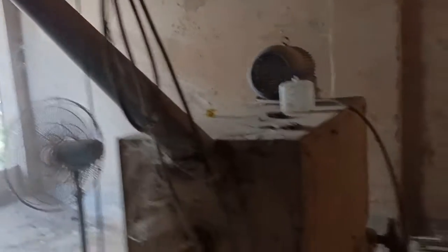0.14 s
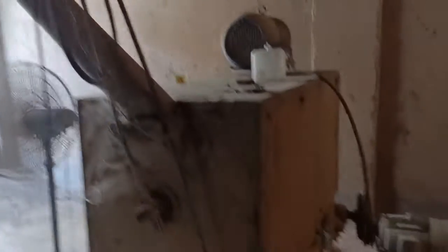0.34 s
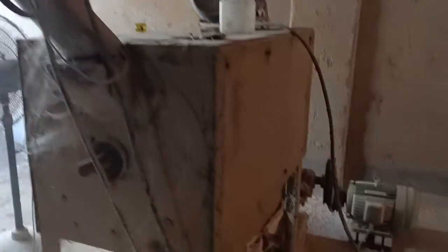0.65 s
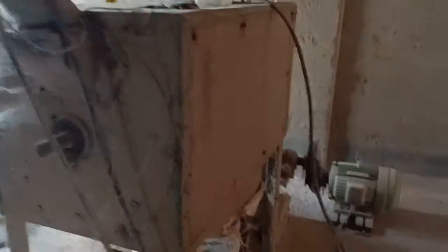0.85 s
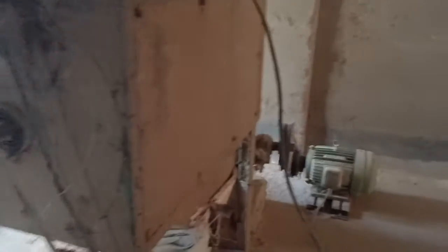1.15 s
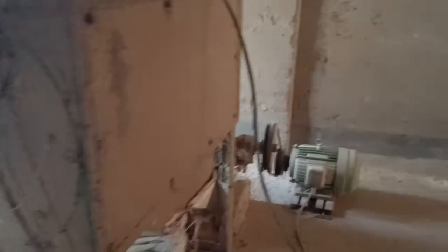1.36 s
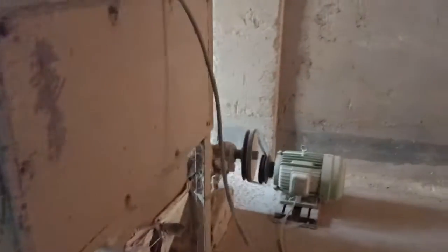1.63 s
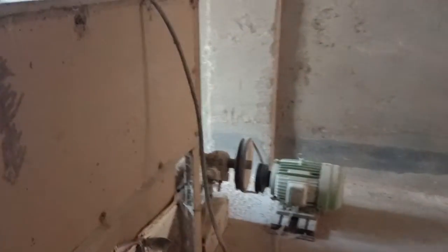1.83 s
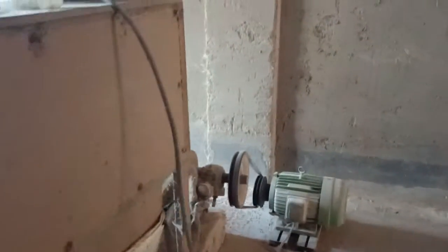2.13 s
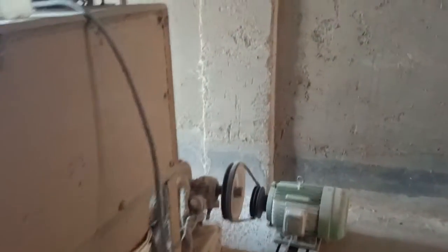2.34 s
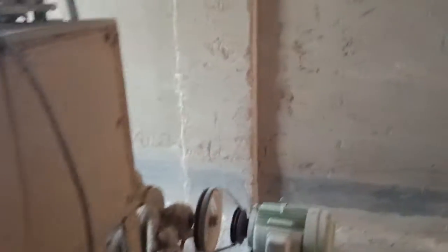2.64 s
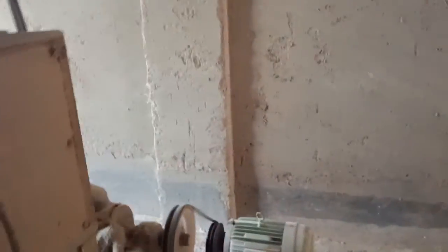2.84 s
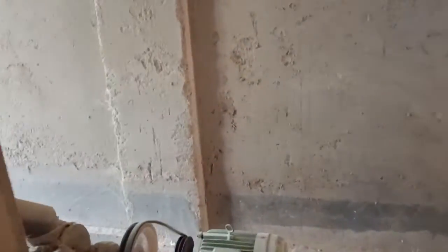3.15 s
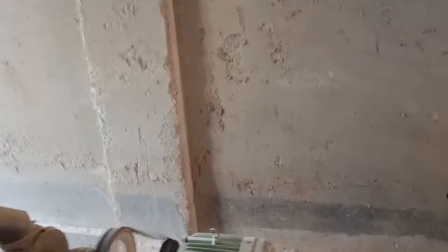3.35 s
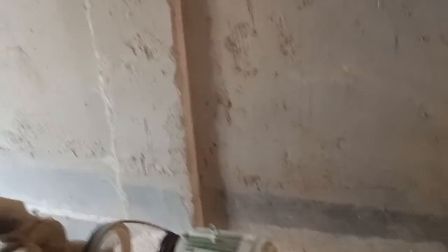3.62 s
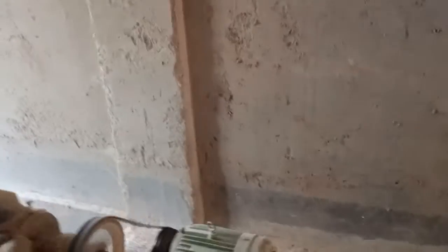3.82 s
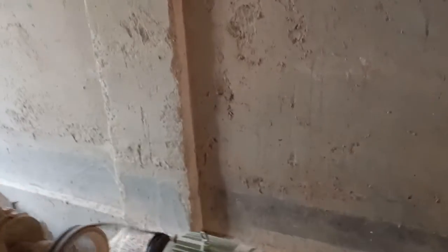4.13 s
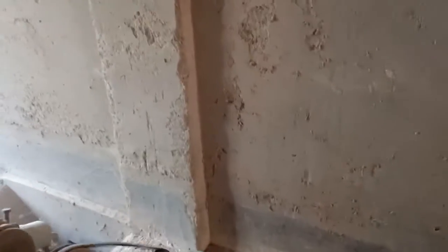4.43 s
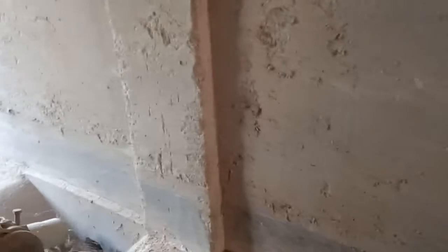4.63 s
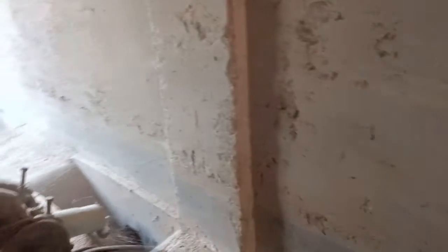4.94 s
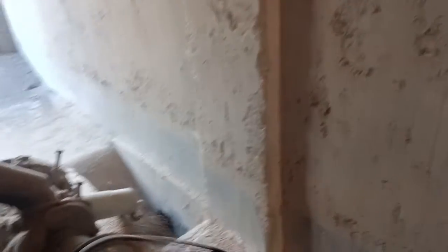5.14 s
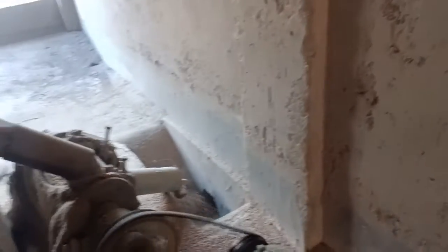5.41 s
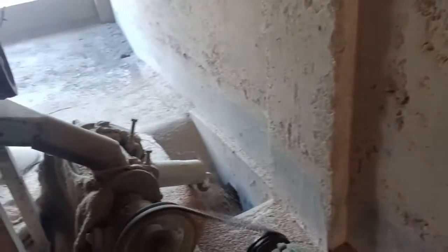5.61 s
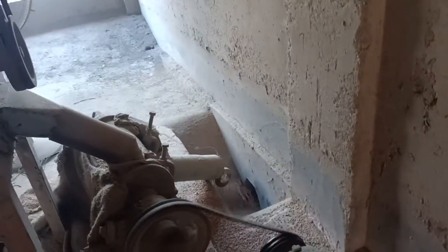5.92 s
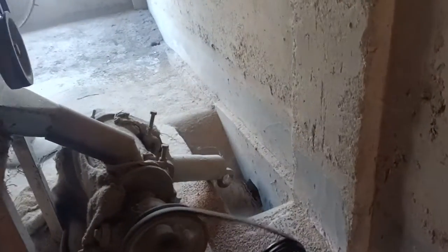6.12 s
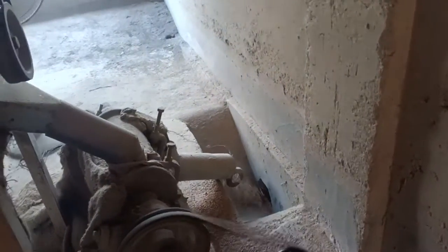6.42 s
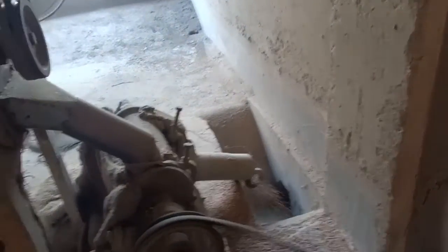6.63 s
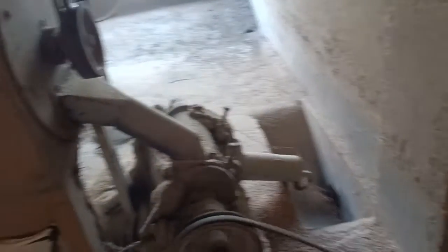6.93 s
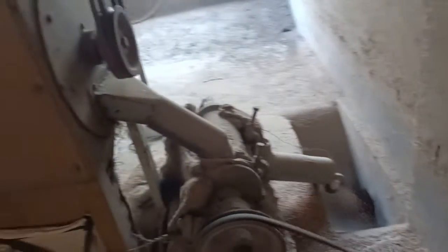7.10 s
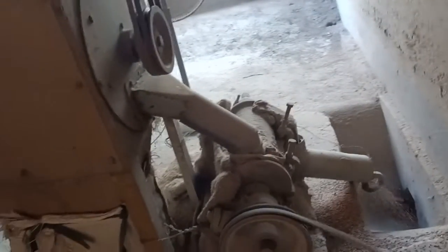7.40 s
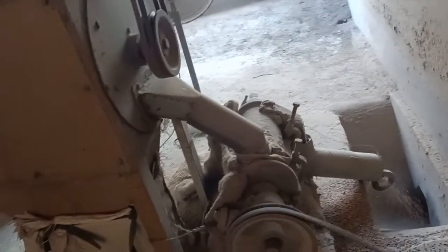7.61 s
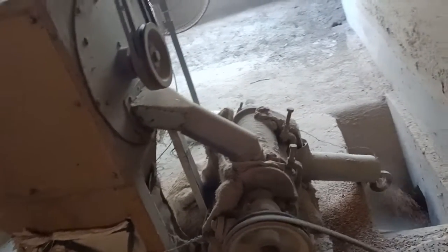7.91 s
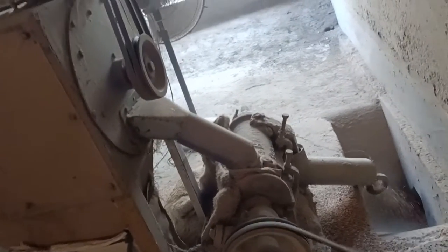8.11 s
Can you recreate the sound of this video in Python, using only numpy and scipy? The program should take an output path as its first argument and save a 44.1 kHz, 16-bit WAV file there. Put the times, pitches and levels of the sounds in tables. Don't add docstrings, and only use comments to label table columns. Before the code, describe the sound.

From 0 s a flour mill runs at full speed in a small bare workshop and continues unbroken to about 8.3 s. The main sound is a loud, dense, bright grinding hiss of grain cracking between plates, wide in stereo and cut off at the very top. Under it sits a rough sheet-metal drone and rumble, with fast shaft shudder at about eight or nine turns a second and a faint wavering motor whine. A hand-held phone is carried past, gently changing level and colour. From roughly 0.9 to 2.6 s a narrow, high metallic ring strengthens on the left; the low boom bumps up near 2.3 s, then slackens around 3.2 s. Short drone surges come near 4.4, 4.9 and 6.7 s. A weaker left ring returns around 5.3 to 6.7 s. From 7 s everything is slightly softer but steady, ending mid-run.

```python
import sys
import numpy as np
from scipy import signal
from scipy.fft import rfft, irfft
from scipy.io import wavfile

SR = 44100
rng = np.random.default_rng(int(sys.argv[2]) if len(sys.argv) > 2 else 0)


def undo_db(level):
    steps = np.asarray(level, float) / 20
    return 10 ** steps


def wav_out(sig):
    wavfile.write(sys.argv[1], SR, np.round(np.clip(np.atleast_2d(sig).T, -1, 1) * 32767).astype(np.int16))


N = 364266
TIME = np.arange(N) / SR
HZ = np.maximum(np.arange(N // 2 + 1) * SR / N, 1)

# time in seconds, closeness to the mill in dB,
# shelter behind the cabinet in dB, aim of the left port at the plates in dB.
WALK = [(0, 1.6, 0.9, 1), (.5, -0.8, 0.3, .5), (.9, -1.4, 0, -0.7), (1.3, 0, 1.8, -.5), (1.75, 1, 1.1, 0.3),
        (2.3, 2.1, .3, .5), (2.8, 1, 0.6, 0.5), (3.35, 1.6, -1.1, -1.4), (3.9, 1.0, 0.0, -.3),
        (4.6, 1.0, -.3, 0.0), (5.3, -0.6, 0.1, 1.6), (5.8, -0.6, -.3, 1), (6.25, -1.5, -0.4, 0.9),
        (6.65, -0.5, -0.3, 0), (7.0, -2.3, -1.5, -1.6), (7.5, -2.2, -0.3, 0.3), (8.26, -1.5, 0, 0)]


def in_time(rows):
    s, *columns = np.transpose(rows)
    return [np.interp(TIME, s, c) for c in columns]


def at_hz(points):
    hz, value = np.transpose(points)
    return np.interp(np.log(HZ), np.log(hz), value)


def rms_one(x):
    return x / np.sqrt(np.mean(x ** 2, axis=-1, keepdims=True) + 1e-20)


def drift(rate_hz):
    pole = np.exp(-80 * np.pi * rate_hz / SR)
    noise = rng.standard_normal(N // 40 + 2002)
    slow = signal.lfilter([1], [1, -2 * pole, pole * pole], noise)[2000:]
    return np.interp(np.arange(N) / 40, np.arange(len(slow)), rms_one(slow - slow.mean()))


def swells(rows):
    return sum(db * np.exp(-(2 * (TIME - s) / length_s) ** 4) for s, length_s, db in rows)


def bands(spectrum, edges_hz):
    below = [0] + [1 / (1 + (HZ / edge) ** 8) for edge in edges_hz] + [1]
    return [irfft(spectrum * (upper - lower), N) for lower, upper in zip(below, below[1:])]


def turning(speed_wobble):
    shaft_hz = 8.57
    return 2 * np.pi * shaft_hz * np.cumsum(1 + speed_wobble * drift(0.62)) / SR


def motor(waver_db, wander_hz):
    # frequency in Hz, rms level in dB.
    whine = [(39, -66), (177, -50), (556, -52), (561, -52), (818, -57), (884, -56), (906, -58), (942, -59)]
    # centre in s, length in s, lift in dB.
    slot_loops = [
        (2.2, 0.36, 9),
        (3.8, 1.3, 9),
        (5.4, 1.1, 8),
    ]
    slot_hz, slot_db = 1213, -57.5
    tones = whine + [(slot_hz, slot_db + swells(slot_loops))]
    clock_s = np.cumsum(1 + wander_hz / 1000 * drift(1.86)) / SR
    out = 0
    for hz, db in tones:
        port_db = db + waver_db * np.array([drift(3), drift(3)])
        out = out + np.sqrt(2) * undo_db(port_db) * np.sin(2 * np.pi * hz * clock_s)
    return out


def shaft(angle, waver_db):
    # multiple of the shaft turn, rms level in dB.
    orders = [(3, -73), (4, -62), (6, -56), (7, -57), (7.4, -58), (8, -54), (9, -57), (10, -59), (12, -55),
              (13, -57), (15, -56), (16, -56)]
    out = 0
    for multiple, db in orders:
        level = np.sqrt(2) * undo_db(db + waver_db * drift(2.3))
        out = out + level * np.sin(multiple * angle + rng.uniform(0, 2 * np.pi))
    return out


def casing(level_db):
    # frequency in Hz, level in dB per Hz.
    rumble = [(15, -47), (25, -25), (58, -21), (97, -10.5), (177, -1.5), (352, -2.5), (454, 0), (689, -6),
              (920, -5.5), (1100, -7), (1230, -5.5), (1590, -9), (1900, -14), (2470, -66), (4180, -120)]
    # frequency in Hz, width in Hz, lift in dB.
    panels = [(177, 30, 3.5), (449, 40, 2), (270, 10, 3), (226, 10, 2), (590, 40, 1.5)]
    # frequency in Hz, left-right likeness (0 to 1).
    likeness = [(60, .97), (130, .94), (260, .92), (430, .8), (600, .63), (780, .48), (950, .3),
                (1300, .14), (2000, .25)]
    # frequency in Hz, left-right difference in dB.
    lean = [(60, 7), (110, -1.5), (200, 0), (380, -1.5), (700, 0), (1290, 3), (2380, 2.5), (4400, 6.5),
            (8120, 2.0), (15000, -0.5)]
    edges_hz = [250, 700]
    # level in dB, share of closeness, share of shelter, flicker in dB.
    settings = [(-36.5, 1.2, 0.64, 1.4), (-32.5, 0.94, -1.46, .4), (-37, 0.57, -.4, 0.55)]
    # centre in s, length in s,
    # lift in dB.
    boom_surges = [
        (.18, 0.24, 1),
        (2.35, 0.23, 2),
        (3.25, .4, -1.5),
    ]
    # centre in s, length in s, lift in dB.
    drone_surges = [
        (.7, 0.25, 1.6),
        (4.35, 0.2, 1.2),
        (4.87, 0.15, 3),
        (6.7, .4, 1.2),
    ]
    half_turn_hz = 1700

    mid, side = rfft(rng.standard_normal((2, N)))
    alike = np.clip(at_hz(likeness), -1, 1)
    pair = np.sqrt(1 + alike) * mid + np.sqrt(1 - alike) * side * [[1], [-1]]
    pair[0] *= np.exp(-1j * np.pi * (HZ / half_turn_hz) ** 1.5)
    lift_db = sum(db / (1 + (2 * (HZ - hz) / width_hz) ** 2) for hz, width_hz, db in panels)
    stop_db = -120 * (HZ > rumble[-1][0])
    pair = pair * undo_db(at_hz(rumble) + lift_db + stop_db + at_hz(lean) * [[.5], [-.5]])

    close_db, shelter_db, _ = in_time(WALK)
    surges_db = [swells(boom_surges), swells(drone_surges), 0]
    out = 0
    for band, surge_db, row in zip(bands(pair, edges_hz), surges_db, settings):
        db, closer, sheltered, flicker_db = row
        walk_db = closer * close_db + sheltered * shelter_db
        gain_db = db + surge_db + walk_db + flicker_db * drift(2.6)
        out = out + band / np.std(band.mean(axis=0)) * undo_db(gain_db)
    return undo_db(level_db) * out


def housing(right_db):
    # centre in s, length in s, lift in dB.
    faced = [
        (1.75, 1.8, 10.5),
        (6.0, 1.5, 3),
    ]
    centre_hz, width_hz, level_db = 4520, 400, -33
    resonance = 1 / (1 + (2 * (HZ - centre_hz) / width_hz) ** 2)
    rings = rms_one(irfft(rfft(rng.standard_normal((2, N))) * resonance, N))
    return rings * undo_db(level_db + swells(faced) + np.array([[0], [right_db]]))


def grinding(angle, cracks_per_s, size_db, feed_db, patchy_db, level_db):
    # frequency in Hz, level in dB per Hz.
    left_port = [(2000, -9.5), (2600, -6), (3400, -5), (4000, -7.5), (4600, -3.5), (5050, -5), (5600, 0),
                 (6250, -9), (7400, -11.5), (9500, -9.5), (10700, -5.5), (11900, -11), (13400, -10.5),
                 (15400, -24.5)]
    # frequency in Hz, level in dB per Hz.
    right_port = [(2000, -14), (2500, -13.5), (3000, -11.5), (3800, -15), (4600, -9.5), (5600, -7.5),
                  (7000, -8), (9000, -7), (9800, -15), (11500, -7), (13200, -11), (14600, -7.5),
                  (15400, -10)]
    edges_hz = [4000, 7000, 12000]
    # level in dB, left-right difference in dB.
    levels = [(-24, 4.5), (-22, 7.5), (-22, 2.5), (-25, -7.5)]
    left_follows = [(0.63, .24, -0.47), (-0.62, -0.15, -0.28), (0.34, -1.4, 1.2), (0.35, -.85, 1.05)]
    right_follows = [(1, .15, -.5), (.65, 0.4, .1), (0.73, -0.6, .35), (.95, -.7, .05)]
    # multiple of the turn, then swell in dB per band, low to top.
    plate_beat = [(1, .1, .25, .1, .1), (2, .2, .2, .45, .5), (3, .25, .15, .25, .25)]
    hiss_start_hz = 2096

    crack_db = size_db * np.minimum(rng.exponential(1, (2, N)), 2)
    cracks = (rng.random((2, N)) < cracks_per_s / SR) * undo_db(crack_db)
    cracks = rms_one(cracks * rng.choice([-1, 1], (2, N)))
    source = cracks * .5 + rng.standard_normal((2, N))
    ports = undo_db(np.array([at_hz(left_port), at_hz(right_port)]))
    ports = ports / (1 + (hiss_start_hz / HZ) ** 4.36)

    walk, feed = np.array(in_time(WALK)), drift(16)
    phases = rng.uniform(0, 2 * np.pi, len(plate_beat))
    out = 0
    for k, band in enumerate(bands(rfft(source) * ports, edges_hz)):
        db, lean_db = levels[k]
        walk_db = np.array([left_follows[k], right_follows[k]]) @ walk
        beat_db = sum(row[k + 1] * np.sin(row[0] * angle + phase) for row, phase in zip(plate_beat, phases))
        patches_db = patchy_db * np.array([drift(5.8), drift(10)])
        gain_db = db + walk_db + beat_db + feed_db * feed + patches_db
        out = out + rms_one(band) * undo_db(gain_db + [[lean_db / 2], [-lean_db / 2]])
    return undo_db(level_db) * out


def scene():
    angle = turning(speed_wobble=0.0041)
    frame = motor(waver_db=3.5, wander_hz=1.44) + shaft(angle, waver_db=3.5)
    rumble = casing(level_db=-0.68)
    hiss = grinding(angle, cracks_per_s=12000, size_db=0.5, feed_db=0.05, patchy_db=0.6, level_db=0.5)
    return frame + rumble + housing(right_db=-15) + hiss


def low_pass(x):
    return signal.sosfilt(signal.butter(12, 16100, fs=SR, output="sos"), x)


def record(dry):
    knee, headroom, top_hz = .6, .3, 15500
    size = np.abs(dry)
    over = np.maximum(size - knee, 0)
    rounded = np.sign(dry) * (np.minimum(size, knee) + headroom * np.tanh(over / headroom))
    mix = irfft(rfft(rounded) * (HZ < top_hz), N)
    return low_pass(mix)


dry = scene()
out = record(dry)
wav_out(out)
```